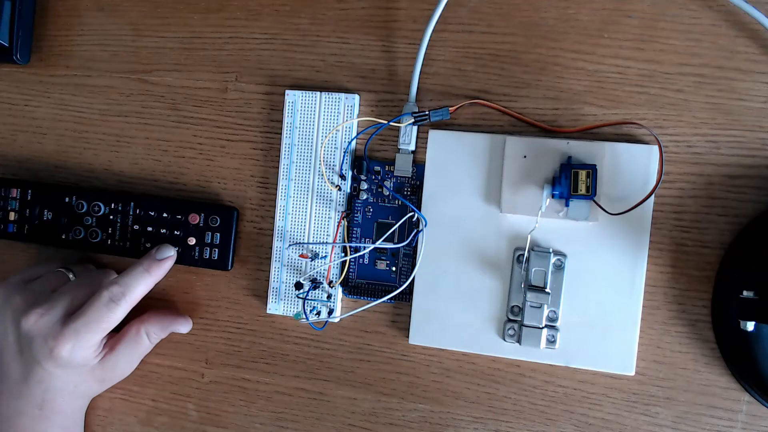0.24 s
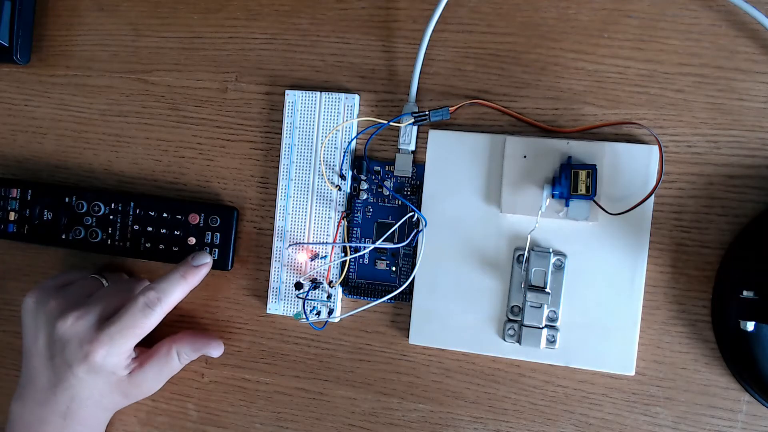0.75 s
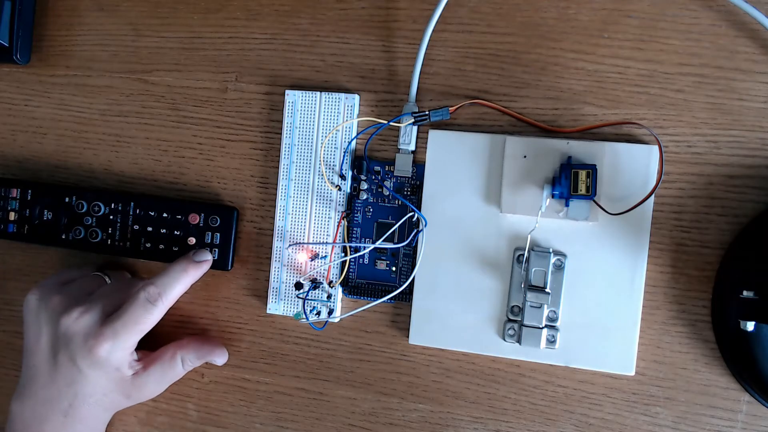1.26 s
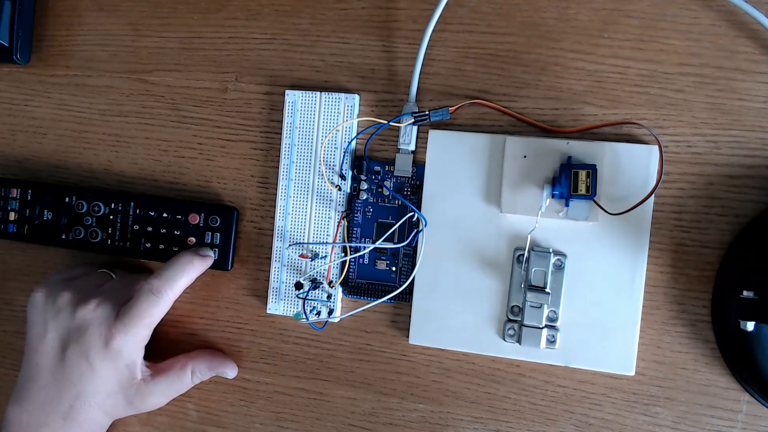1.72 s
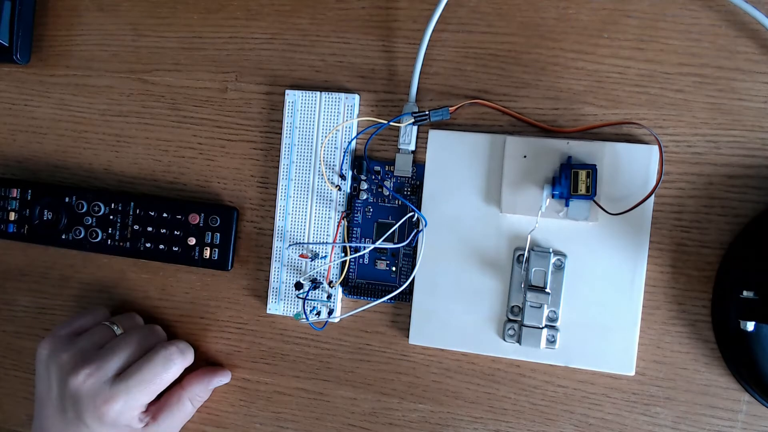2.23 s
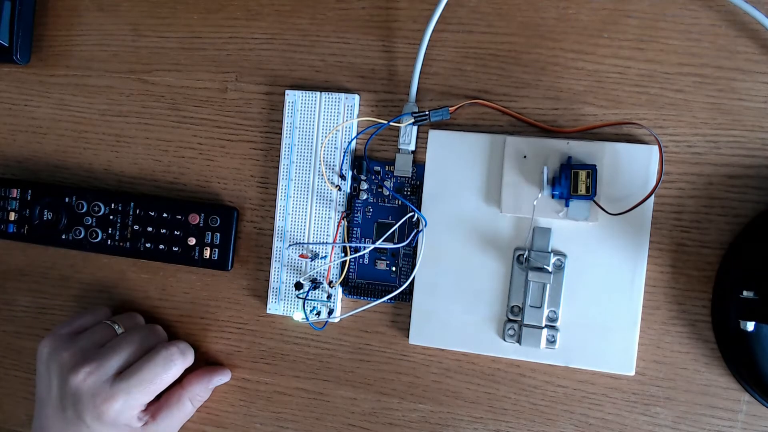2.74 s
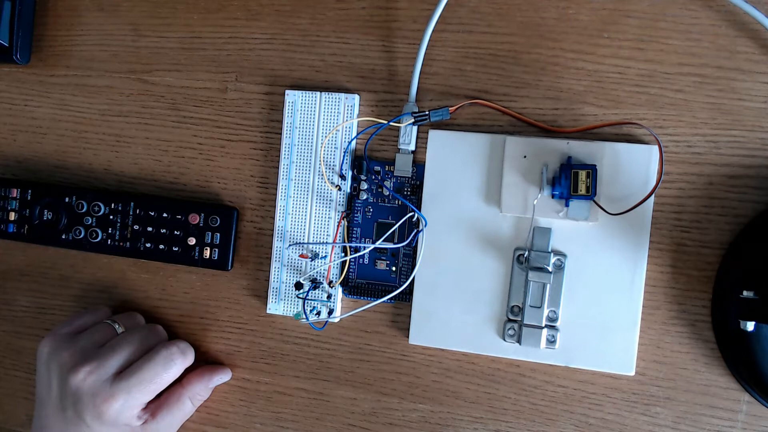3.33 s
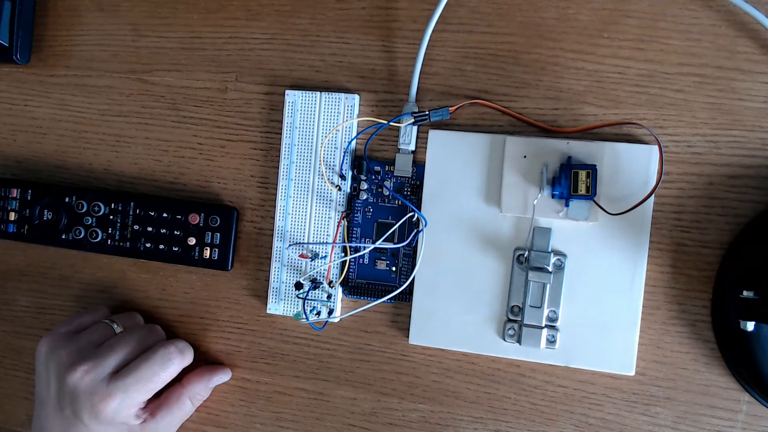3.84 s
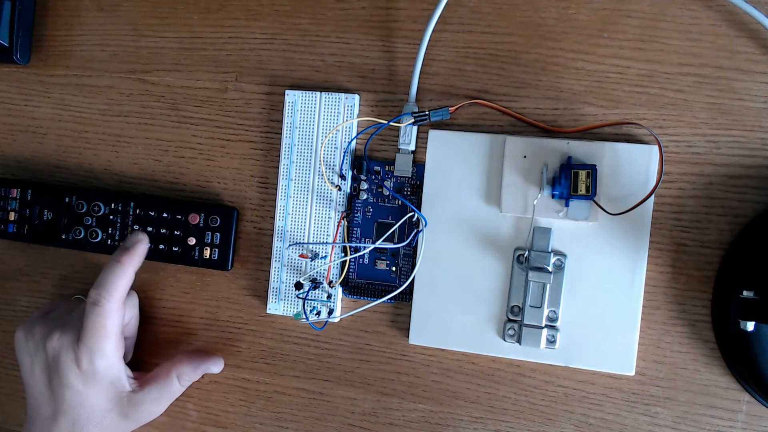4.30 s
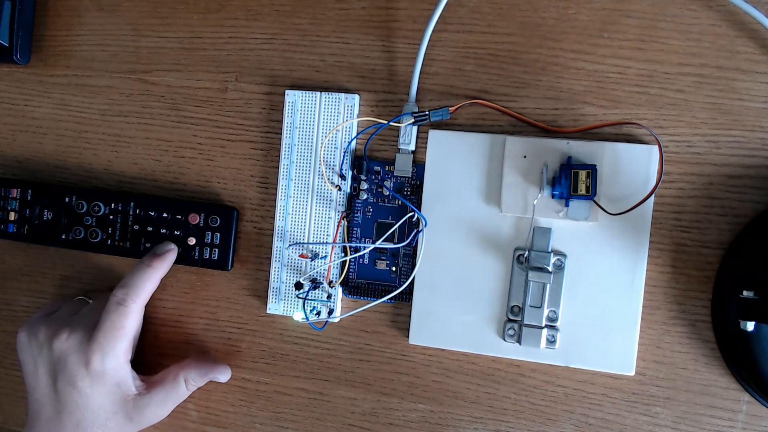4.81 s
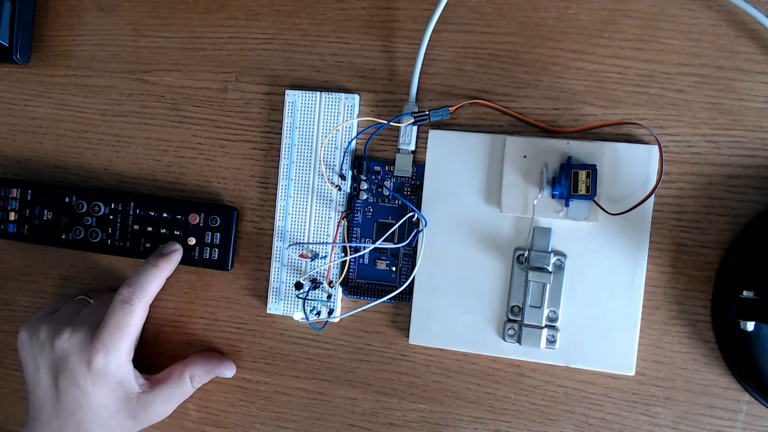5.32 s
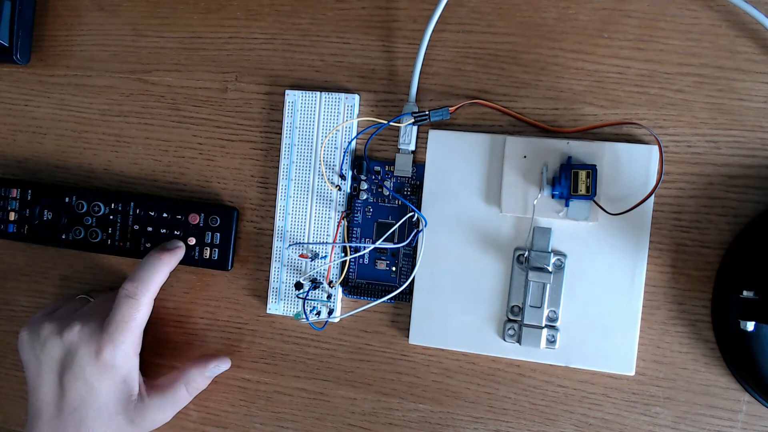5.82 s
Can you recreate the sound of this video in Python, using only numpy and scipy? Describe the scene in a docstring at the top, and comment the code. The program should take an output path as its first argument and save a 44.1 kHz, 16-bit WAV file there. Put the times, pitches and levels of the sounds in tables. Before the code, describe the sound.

Finger thumps and clicks a plastic remote on a wooden desk, then a tiny geared motor whirs for half a second, dragging a metal bolt over low hum.

```python
"""A finger thumps and clicks the buttons of a remote control that rocks on a wooden desk, and the hand
brushes the wood: struck desk modes, snaps through a plastic shell and coloured noise.
A small servo then whirs for half a second and draws back a slide bolt: gear tones, tooth rattle and
rotor tone follow its shaft speed and load, and knocks ring the bolt. More finger and hand sounds follow.
Faint ticks come from further off; an appliance hums steadily over room air throughout."""
import sys
import numpy as np
from scipy import signal
from scipy.fft import rfft, irfft
from scipy.io import wavfile

SR = 44100
rng = np.random.default_rng(int(sys.argv[2]) if len(sys.argv) > 2 else 0)


def wrap_up_sound(samples):
    """Save the sound to the file named by the first command line argument, as 16-bit audio."""
    columns = np.atleast_2d(samples).T
    # keep every value between -1 and 1, then stretch to whole-number steps
    tamed = np.clip(columns, -1, 1)
    steps = np.round(tamed * 32767).astype(np.int16)
    wavfile.write(sys.argv[1], SR, steps)


N = 266981
T = np.arange(N) / SR

# motor starts, gears engage, motor brakes, gear sound ends (s)
START_S, ENGAGE_S, BRAKE_S, STOP_S = 2.033, 2.049, 2.44, 2.51
PINION_TEETH, WHEEL_TEETH = 9, 47
FREE_SPEED = 345  # shaft turns a second without load


def servo(second_db=-12, rotor_rough=0.69, rough_hz=50):
    """Gear whine and rattle join the tone of the unbalanced rotor, which grows steeply with shaft speed."""
    rotor_db, rotor_power = -42.5, 4.2  # level at free speed, power law with speed
    pace = speed()
    turns = np.cumsum(pace) / SR
    once = np.sin(2 * np.pi * turns)
    twice = np.sin(2 * np.pi * 2 * turns)
    rotor = unit(once + amp(second_db) * twice)
    rotor = rotor * (1 + rotor_rough * drift(rough_hz))
    rotor = rotor * amp(rotor_db) * (pace / FREE_SPEED) ** rotor_power
    return engaged() * (whine(turns) + rattle(turns) + rotor)


def speed():
    """Shaft turns a second: the motor spins up, sags under the bolt, recovers and brakes."""
    spin_up_s, braking = .04, 1180  # braking: turns a second lost each second
    free = FREE_SPEED * (1 - np.exp(-np.maximum(T - START_S, 0) / spin_up_s))
    return free - bolt_load() - braking * np.clip(T - BRAKE_S, 0, STOP_S - BRAKE_S)


# load of the bolt on the motor: time_s, speed_loss (turns a second)
LOAD = [(2.17, 0), (2.222, 72), (2.25, 90), (2.28, 93.5), (2.31, 90), (2.43, 47)]


def bolt_load():
    """The pull of the bolt, as the shaft speed it costs the motor, at every sample."""
    time_s, speed_loss = np.transpose(LOAD)
    return np.interp(T, time_s, speed_loss)


def engaged():
    """The gear sound fades in quickly and runs down to the stop."""
    attack_s, release_s = 0.025, 0.041
    fade_in = np.clip((T - ENGAGE_S) / attack_s, 0, 1)
    run_down = np.clip((STOP_S - T) / release_s, 0, 1)
    return (fade_in * run_down) ** 2


# gear tones: pinion-tooth multiples, shaft sidebands and one odd high tone:
# multiple (of shaft speed), level_db (relative, before the case)
MESH = [(9, -4), (18, 4), (19, -4), (21, -9), (26, -1.5), (27, 3), (28, -2), (30, -8), (35, -6), (37, -5),
        (42.4, -1)]


def whine(turns):
    """Gear tones sound through the case; uneven wheel teeth come round again and add sidebands."""
    uneven, flutter, flutter_hz = .3, .2, 80  # phase swings in radians
    throb, fading_db, fading_hz = .2, 2.5, 12
    wheel = turns * PINION_TEETH / WHEEL_TEETH
    out = np.zeros(N)
    for multiple, db in MESH:
        timing = wheel_pattern(wheel, (2, 4, 7))
        force = wheel_pattern(wheel, (1, 5))
        phase = 2 * np.pi * multiple * turns + uneven * timing + flutter * drift(flutter_hz)
        level = amp(db + fading_db * drift(fading_hz)) * (1 + throb * force)
        out += level * np.cos(phase)
    return through_case(out) * whine_level()


def wheel_pattern(wheel, cycles):
    """Unevenness that repeats with each wheel turn: cosines with the given cycles a turn."""
    return unit(sum(np.cos(2 * np.pi * (k * wheel + rng.random())) for k in cycles))


def whine_level():
    """The teeth sing louder the harder they are loaded."""
    heaviest_db, power = -25.3, 2.4  # gain at the heaviest load, power law with load
    swing = 2.2  # the whine swings this many times as far as the rattle
    load = bolt_load()
    return (load / load.max()) ** power * amp(heaviest_db + swing * tension_db())


def rattle(turns, spread_db=4, pulsing=0.13):
    """The pinion strikes wheel teeth of uneven force, each blow varying at random, and slides and grinds."""
    tooth = np.floor(turns * PINION_TEETH).astype(int)
    force = amp(spread_db * rng.standard_normal(WHEEL_TEETH))[tooth % WHEEL_TEETH]
    strikes = np.diff(tooth, prepend=0) * force * rng.standard_normal(N)
    sliding = (1 + pulsing * np.cos(2 * np.pi * turns)) * rng.standard_normal(N)
    contact = .4 * unit(strikes) + .4 * unit(sliding) + .8 * grind(turns)
    return through_case(contact) * rattle_level()


def grind(turns, count=130):
    """Worn tooth faces pass again each wheel turn: many gliding partials, a few standing out."""
    wheel = turns * PINION_TEETH / WHEEL_TEETH
    running = (T > ENGAGE_S) & (T < STOP_S)
    out = np.zeros(N)
    for k, (place, size, phase, pace, start) in enumerate(rng.random((count, 5))):
        multiple = 3 * (k + 3) + int(3 * place)  # of wheel speed
        swell = np.cos(2 * np.pi * ((2 + 6 * pace) * T[running] + start))  # each at its own 2 to 8 Hz
        strength = 1 / (size + .06) ** .7
        out[running] += swell * strength * np.cos(2 * np.pi * (multiple * wheel[running] + phase))
    return out / np.std(out[running])


def rattle_level():
    """The rattle steps up as soon as the teeth bear the bolt."""
    free_db, bearing_db = -23.5, 5  # running free, extra gain under load
    bearing_load = 15  # scale of the step (turns a second lost)
    return amp(free_db + bearing_db * np.tanh(bolt_load() / bearing_load) + tension_db())


# wire link goes slack, then snaps taut:
# slack_s, slack_db (gain while the link is slack), taut_s, jolt_db (gain as it pulls taut)
TUGS = [(2.153, 2, 2.208, 5.5), (2.394, -1, 2.428, 2.5)]


def tension_db():
    """Gear level shifts briefly while the link is slack and jolts up when it pulls taut."""
    slack_half_s, jolt_half_s = .012, .017
    return sum(slack_db * bell(slack_s, slack_half_s) + jolt_db * bell(taut_s, jolt_half_s)
               for slack_s, slack_db, taut_s, jolt_db in TUGS)


# resonances of the servo case and its base plate: pitch_hz, gain_db
CASE = [(150, -35.5), (450, -9.5), (700, -14.5), (1000, -14), (2000, -15), (2800, -14.5), (3150, -11.5),
        (3550, -9.5), (4250, -10.5), (4700, -11), (5500, 2), (6250, -4.5), (7100, -4), (7900, -4.5),
        (8500, -9.5), (9350, -8), (10100, -17.5), (12000, -14), (16000, -17.5)]


def through_case(x):
    """The case and base plate colour what the gears do."""
    return colour(x, CASE)


# knocks of the bolt and its wire link: start_s, level_db (relative), centre_hz (of the blow)
BOLT_KNOCKS = [(2.206, -17.5, 806), (2.378, -25.5, 1150), (2.401, -21, 2460)]
# modes of the bolt on its plate: pitch_hz, level_db (relative), t60_s
BOLT_MODES = [(527.4, 7, 0.0052), (730, -10.5, 0.0055), (978, -2.5, 0.018), (1676, 3, 0.012),
              (2707, -1.5, 0.016), (2790, -1.5, 0.021)]


def bolt(octaves=0.89):
    """Each knock rings the modes of the bolt that lie near the centre of the blow."""
    out, t = np.zeros(N), T[:SR // 8]
    for s, db, centre_hz in BOLT_KNOCKS:
        for hz, mode_db, t60 in BOLT_MODES:
            share = np.exp(-(np.log2(hz / centre_hz) / octaves) ** 2)
            add(out, s, share * amp(db + mode_db) * ring(t, hz, t60))
    return low_cut(out, hz=336.0)


# finger on the remote: start_s, thump_db (relative), soft_hz (softness cut-off),
# click_db (relative, before the shell), centre_hz (of the click)
PRESSES = [(0.064, -36, 111, -68, 3000), (0.428, -44.5, 380, -39, 1000), (0.452, -48, 403, -44, 4000),
           (0.516, -44, 394, -38, 1800), (1.521, -21, 83, -45, 1000), (1.55, -54, 198, -31.5, 4870),
           (1.776, -20, 253, -17.5, 816), (5.3258, -22.5, 80.5, -14.5, 3970), (5.43, -60, 120.7, -35, 4470),
           (5.478, -45, 249, -45, 5060), (5.615, -41.5, 152, -38, 5960), (5.6856, -27.5, 145, -22.5, 1480)]
# modes of the desk top: pitch_hz, level_db (relative), t60_s
DESK = [(102.1, 3, 0.15), (111, -6, 0.047), (155.8, -0.5, 0.11), (174, 2.5, 0.092), (393, -8.5, 0.111),
        (485, -12.5, 0.07), (640, -13, 0.063)]


def thumps(swell_cycles=1.41):
    """The remote rocks on the desk; a soft push swells slowly and reaches only the lowest modes."""
    out, t = np.zeros(N), T[:SR // 2]
    for s, db, soft_hz, _, _ in PRESSES:
        push = 1 - np.exp(-(t * soft_hz / swell_cycles) ** 2)
        for hz, mode_db, t60 in DESK:
            reach = 1 / np.hypot(1, (hz / soft_hz) ** 2)
            add(out, s, 2 * amp(db + mode_db) * reach * push * ring(t, hz, t60))
    return low_cut(out, hz=87)


# plastic shell of the remote: pitch_hz, gain_db
SHELL = [(150, -20.5), (450, 13.5), (750, 15.5), (950, 7.5), (1250, 7), (1750, 1), (2300, 2), (3100, 1.5),
         (4400, -1.5), (5500, -4), (8000, -2), (11000, -7), (16000, -5.5)]


def clicks(rough, crack_s=0.0033, band_span=2.3):
    """Buttons and feet of the remote snap against its plastic shell."""
    out = np.zeros(N)
    for s, _, _, db, centre_hz in PRESSES:
        band = np.clip([centre_hz / band_span, centre_hz * band_span], 20, .45 * SR)
        b, a = signal.butter(1, band, "band", fs=SR)
        add(out, s, amp(db) * signal.lfilter(b, a, snap(crack_s, rough)))
    return colour(out, SHELL)


def snap(crack_s, rough):
    """One sharp impact, trailed by rough contact of the given strength."""
    t = T[:SR // 10]
    chatter = rng.standard_normal(len(t)) * np.exp(-t / crack_s)
    return (t == 0) + rough * chatter / np.linalg.norm(chatter)


# strokes of the hand over the wood: peak_s, half_length_s (to 1/e), hiss_db, rub_db (rms at the peak)
STROKES = [(0.044, 0.15, -72.5, -63.5), (.24, 0.12, -68.5, -76), (0.503, .1, -88, -62.5),
           (1.355, .12, -86, -58.5), (1.546, 0.081, -73, -56.5), (1.772, .12, -62, -78),
           (5.833, 0.059, -60.5, -61.5), (5.964, 0.069, -55.5, -68), (6.05, 0.025, -60, -52.5)]
# dry hiss of light skin: pitch_hz, level_db (per Hz, relative)
SKIN = [(300, -8.5), (1200, -2), (2700, 0.5), (3300, 2), (3900, 4.5), (4600, -1), (8000, -4.5),
        (11000, -12), (16000, -11.5)]
# dull rub of a pressed palm: pitch_hz, level_db (per Hz, relative)
PALM = [(25, -33), (120, -18.5), (170, -5), (205, 12), (260, -0.5), (500, -2), (1200, -12), (3000, -20.5),
        (8000, -48)]


def hand(grain_db=1.0, grain_hz=120):
    """Skin brushes unevenly over the wood grain: a dry hiss when light, a dull rub when pressed."""
    friction = rng.standard_normal(N) * amp(grain_db * drift(grain_hz))
    hiss, rub = np.zeros((2, N))
    for s, half_s, hiss_db, rub_db in STROKES:
        swell = bell(s, half_s)
        # overlapping strokes add in power
        hiss = np.hypot(hiss, amp(hiss_db) * swell)
        rub = np.hypot(rub, amp(rub_db) * swell)
    return unit(colour(friction, SKIN)) * hiss + unit(colour(friction, PALM)) * rub


# swells of the deep wobble: start_s, rise_s, level_db (rms at the end of the rise)
SWAYS = [(0, .2, -52), (1.53, .07, -38), (1.66, .12, -46.5), (5.35, .36, -43.5)]


def sway(wander=0.2):
    """A deep 24 Hz wobble; each swell builds up and dies away."""
    sway_hz, fall_db_per_s = 24, 37.5
    level = np.zeros(N)
    for s, rise_s, db in SWAYS:
        rise = np.clip((T - s) / rise_s, 0, 1)
        level += rise * amp(db - fall_db_per_s * np.maximum(T - s - rise_s, 0))
    return level * unit(np.sin(2 * np.pi * sway_hz * T + wander * drift(5)))


# faint ticks further off in the room: start_s, level_db (relative, before colouring)
TICKS = [(3.032, -36), (3.053, -38), (3.111, -40.5), (4.034, -44), (4.185, -54)]
# colour of the ticks: pitch_hz, gain_db
TICK_COLOUR = [(800, -7), (1700, 12), (2600, 4.5), (3500, 7), (5000, -3), (8000, -4), (14000, -24)]


def ticks(crack_s=0.0088, rough=0.93):
    """Small far ticks: sharp snaps with a short rough trail."""
    out = np.zeros(N)
    for s, db in TICKS:
        add(out, s, amp(db) * snap(crack_s, rough))
    return colour(out, TICK_COLOUR)


# reverberation of the small room: pitch_hz, t60_s
ROOM = [(100, 0.28), (500, 0.25), (2000, 0.26), (3500, 0.36), (5500, 0.29), (9300, 0.3), (11000, 0.34),
        (16000, 0.15)]


def room(x, first_s=0.0068):
    """Reflections of a small room: sparse taps, each band dying at its own speed."""
    taps = rng.choice([-1., 1.], SR) * (rng.random(SR) < 1 / 10) * (T[:SR] > first_s)
    hz, t, z = signal.stft(taps, SR, nperseg=256)
    decay = amp(-60 * t / read(ROOM, hz)[:, None])
    tail = signal.istft(z * decay, SR, nperseg=256)[1]
    return signal.fftconvolve(x, tail / np.linalg.norm(tail))[:N]


# hum lines of the appliance: pitch_hz, level_db (rms)
HUM = [(59.2, -69), (118.4, -49), (150.7, -63.5), (247.6, -71), (323.0, -70), (360.7, -67), (382.2, -74),
       (430.7, -72), (527.6, -75.5), (823.6, -81)]
# rush of room air: pitch_hz, level_db (per Hz, relative)
AIR = [(20, -11.5), (30, -8.5), (45, -23), (80, -8.5), (105, -9), (125, -15), (155, -10), (190, -25.5),
       (340, -22.5), (560, -32.5), (900, -37.5), (1850, -41), (2700, -48), (6000, -52), (15500, -56)]


def background(waver=0.085, waver_hz=5, air_db=-52):
    """Hum lines of an appliance waver in level and phase over the rush of room air."""
    hum = np.zeros(N)
    for hz, db in HUM:
        swell = 1 + waver * drift(waver_hz)
        phase = 2 * np.pi * (hz * T + rng.random()) + waver * drift(waver_hz)
        hum += amp(db) * unit(swell * np.sin(phase))
    return hum + amp(air_db) * unit(colour(rng.standard_normal(N), AIR))


def amp(db):
    """Decibels to gain."""
    return 10 ** (np.asarray(db) / 20)


def unit(x):
    """Scales to rms 1."""
    return x / np.sqrt(np.mean(x ** 2) + 1e-20)


def ring(t, hz, t60):
    """A struck mode: a sine that falls by 60 dB in t60 seconds."""
    return np.exp(-np.log(1000) * t / t60) * np.sin(2 * np.pi * hz * t)


def bell(s, half_s):
    """A swell that peaks at 1 at time s."""
    return np.exp(-((T - s) / half_s) ** 2)


def drift(rate_hz):
    """Random wander of rms 1: noise kept below about rate_hz."""
    hz = np.fft.rfftfreq(N, 1 / SR)
    return unit(irfft(rfft(rng.standard_normal(N)) * np.exp(-(hz / rate_hz) ** 2), N))


def read(points, hz):
    """A spectrum table on a log-frequency axis."""
    f, value = np.transpose(points)
    return np.interp(np.log(hz + 1), np.log(f + 1), value)


def colour(x, points):
    """Causal minimum-phase filter with the given spectrum."""
    log_gain = np.log(amp(read(points, abs(np.fft.fftfreq(4096, 1 / SR)))))
    taps = np.fft.ifft(np.exp(np.conj(signal.hilbert(log_gain)))).real
    return signal.fftconvolve(x, taps[:len(taps) // 2])[:len(x)]


def low_cut(x, hz):
    """High-pass: keeps the thumps and knocks free of deep bass."""
    return signal.sosfilt(signal.butter(2, hz, "high", fs=SR, output="sos"), x)


def add(mix, s, sound):
    """Mixes a sound in at time s."""
    part = mix[round(s * SR):][:len(sound)]
    part += sound[:len(part)]


def scene(servo_room_db=-9, click_room_db=-2, thump_room_db=-16, tick_room_db=3):
    """All sources, with the room's answer."""
    machine, thump, tick = servo() + bolt(), thumps(), ticks()
    # the room answers only the sharp impact of each click, giving a smooth tail
    wet = room(amp(servo_room_db) * machine + amp(click_room_db) * clicks(rough=0)
               + amp(thump_room_db) * thump + amp(tick_room_db) * tick)
    near = machine + clicks(rough=1.23) + thump + hand() + sway()
    return (near + tick + wet + background())[None]


def record(dry):
    """Band limit: a steep linear-phase low-pass removes the extreme treble."""
    edge_hz = 15750
    taps = signal.firwin(511, edge_hz, window=("kaiser", 9), fs=SR)
    return signal.oaconvolve(dry, taps[None], "same")


dry = scene()
out = record(dry)
wrap_up_sound(out)
```